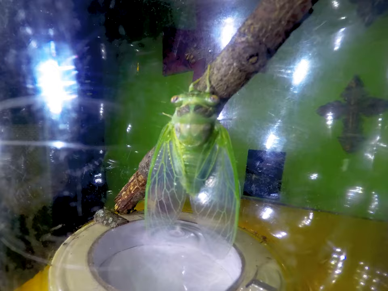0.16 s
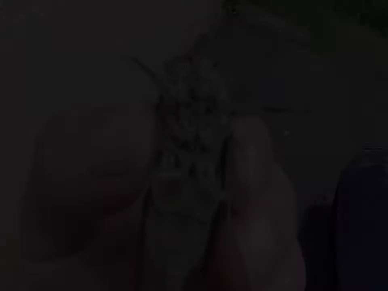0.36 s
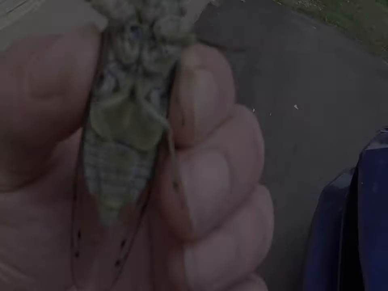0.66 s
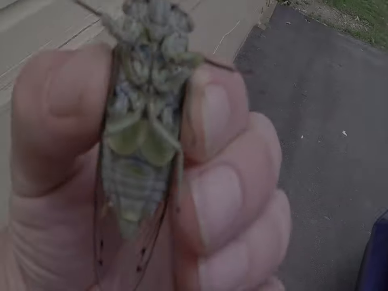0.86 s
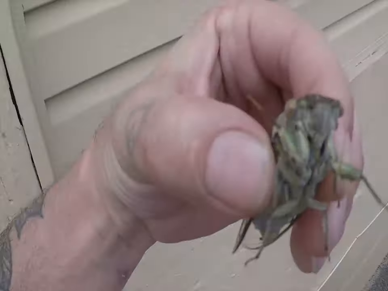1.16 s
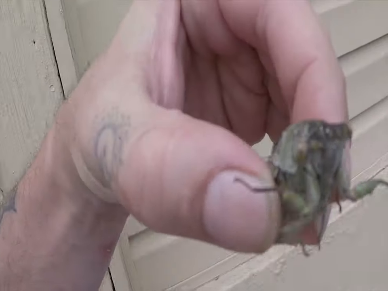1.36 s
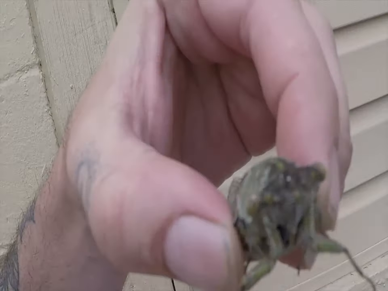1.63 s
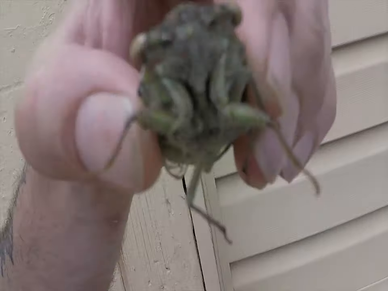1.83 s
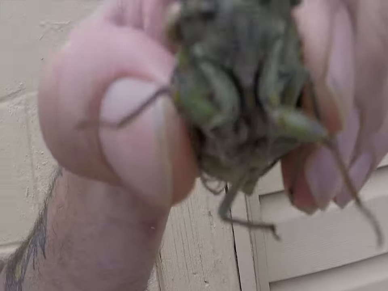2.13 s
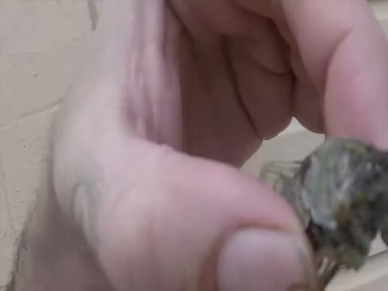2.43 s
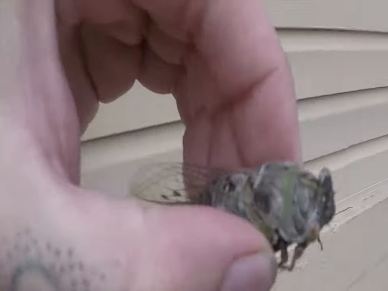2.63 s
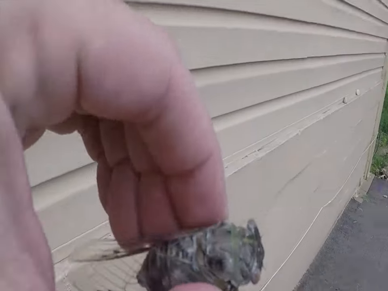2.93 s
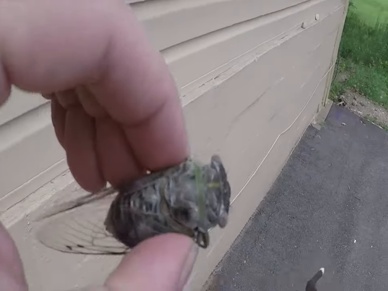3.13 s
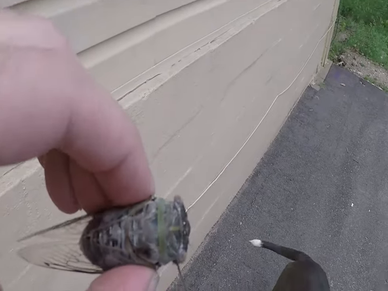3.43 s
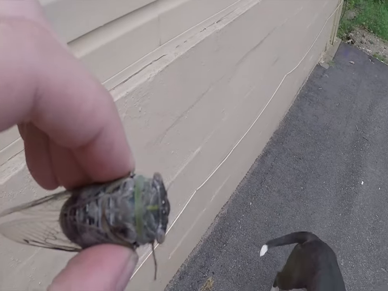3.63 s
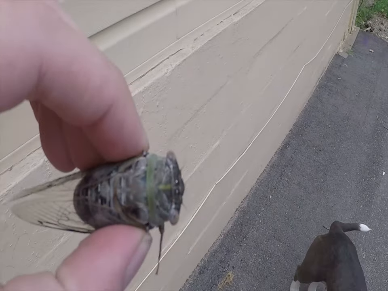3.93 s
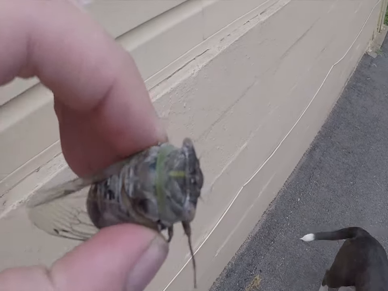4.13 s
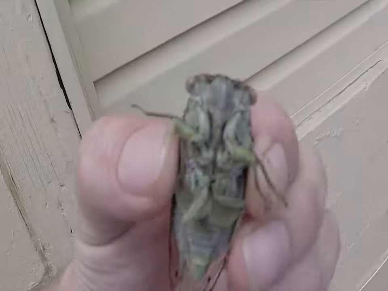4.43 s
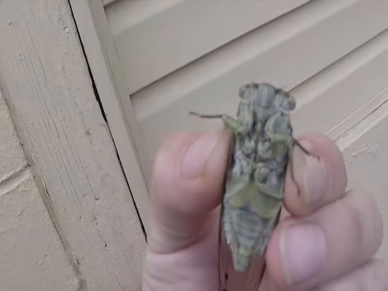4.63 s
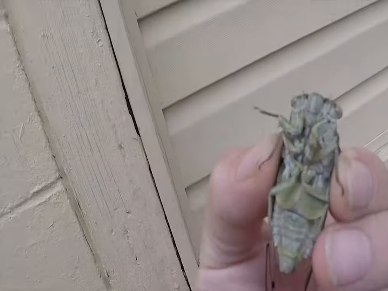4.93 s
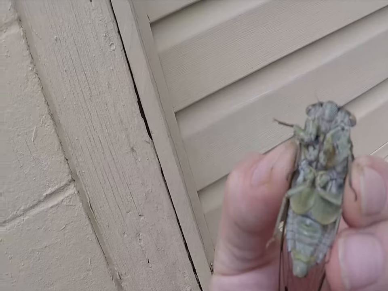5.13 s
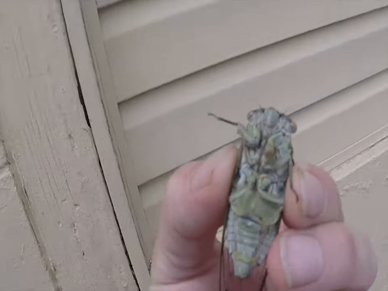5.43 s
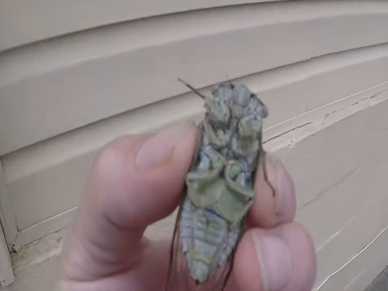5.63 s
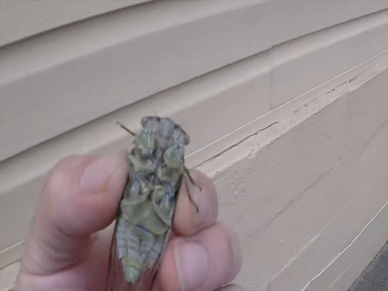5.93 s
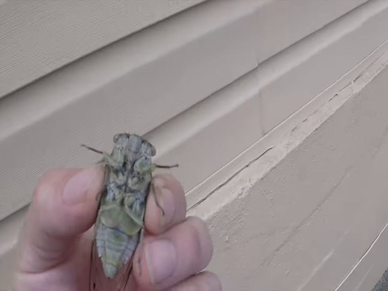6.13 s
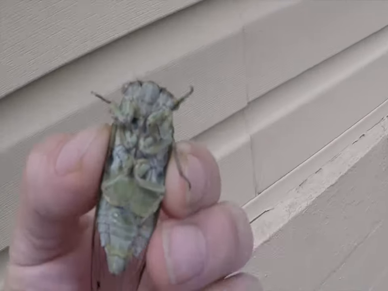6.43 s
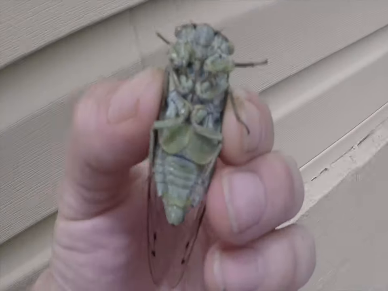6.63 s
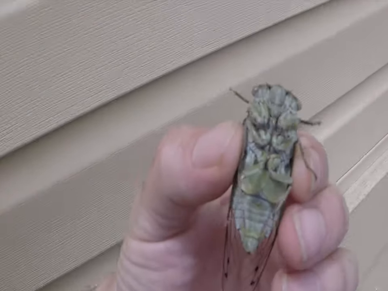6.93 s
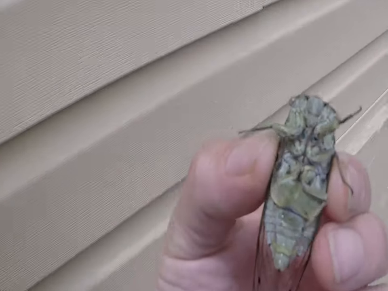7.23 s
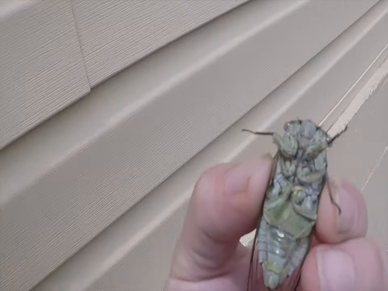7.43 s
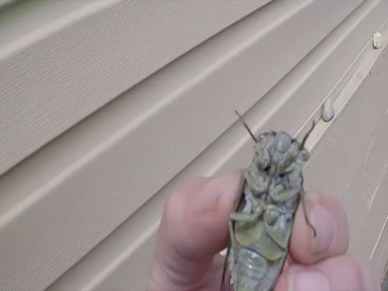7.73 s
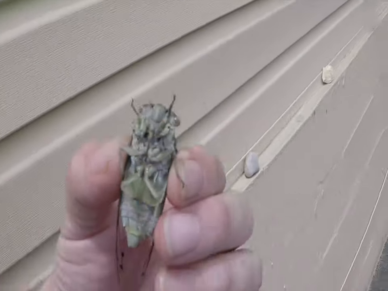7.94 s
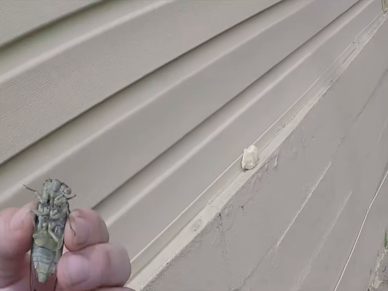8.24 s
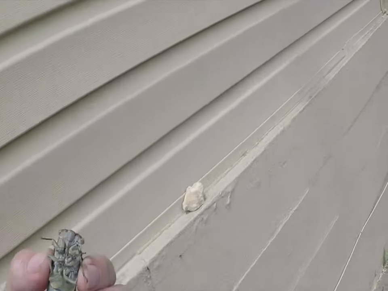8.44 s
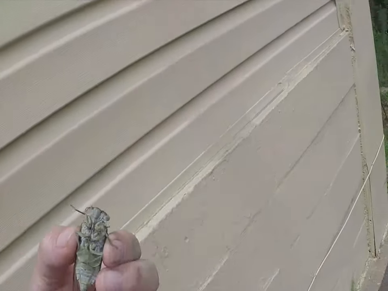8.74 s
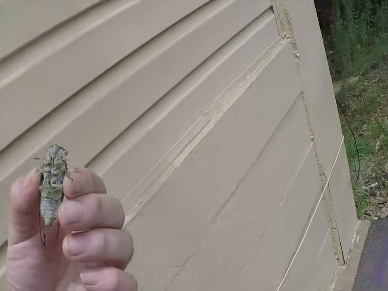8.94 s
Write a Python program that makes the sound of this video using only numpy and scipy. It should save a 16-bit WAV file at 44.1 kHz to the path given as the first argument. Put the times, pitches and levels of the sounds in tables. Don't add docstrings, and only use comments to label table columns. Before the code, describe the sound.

After brief silence, a steady outdoor compressor and fan hum with airy roar cuts in abruptly; light finger taps, wind thumps, and one sharp snap.

```python
import sys
import numpy as np
from scipy import signal
from scipy.fft import rfft, irfft, next_fast_len
from scipy.io import wavfile

SR = 44100
rng = np.random.default_rng(int(sys.argv[2]) if len(sys.argv) > 2 else 0)


def level_to_linear(level):
    exponent = np.asarray(level, float) / 20
    return 10 ** exponent


def persist_wave(psi):
    counts = np.round(np.clip(psi, -1, 1) * 32767).astype(np.int16)
    wavfile.write(sys.argv[1], SR, np.atleast_2d(counts).T)


N = 399987
STEP = 16
CUT_IN_S = .7974


def rms_one(x):
    return x / np.sqrt(np.mean(x ** 2) + 1e-20)


def pan(db):
    return level_to_linear(np.array([[db / 2], [-db / 2]]))


def clock():
    return np.arange(N // STEP + 1) * STEP / SR


def held(control):
    return np.repeat(control, STEP)[:N]


def drift(rate):
    r = np.exp(-2 * np.pi * rate * STEP / SR)
    noise = rng.standard_normal(N // STEP + 5001)
    slow = signal.lfilter([1], [1, -2 * r, r * r], noise)[5000:]
    return rms_one(slow - slow.mean())


def shifted(level_db, shifts):
    t = clock()
    return level_db + sum(db * np.exp(-.5 * ((t - s) / half) ** 2) for s, half, db in shifts)


def swells(rows, rest_db, edge):
    t = clock()
    power = 0
    for s, length, db in rows:
        plateau = (np.tanh((t - s) / edge) - np.tanh((t - s - length) / edge)) / 2
        power = power + level_to_linear(2 * db) * plateau
    return 10 * np.log10(level_to_linear(2 * rest_db) + np.abs(power))


def port_white():
    # f/Hz, likeness (0-1), left leads/rad, left minus right level/dB
    port_table = [(20, .955, 0, -1.3), (60, .95, .05, -1), (150, .982, .13, 0), (450, .99, .25, 1),
                  (700, .72, .5, 2), (1000, .25, 1, 3), (1250, .45, 3, 1), (1500, .2, 1.2, 4),
                  (1750, .72, 2.2, 3), (2050, .62, 3.1, 2), (2400, .7, 4.6, 1), (2700, .25, 5.6, 2),
                  (3000, .58, 6.1, 1.5), (4200, .52, 6.6, 1), (4750, .12, 7.3, 0), (6000, .18, 9.4, 0),
                  (7500, .1, 9, -1), (8500, .08, 10, -3.5), (15000, .08, 14, -3)]
    shared, left, right = rfft(rng.standard_normal((3, next_fast_len(N))))
    hz = np.linspace(.01, SR / 2, len(shared))
    at, alike, lead, tilt_db = np.transpose(port_table)
    alike = np.interp(hz, at, np.clip(alike, 0, 1))
    lead = np.interp(hz, at, lead)
    tilt_db = np.interp(hz, at, tilt_db)
    both = []
    for side, own in ((0.96, left), (-0.99, right)):
        common = np.sqrt(alike) * shared * np.exp(.5j * side * lead)
        both.append(level_to_linear(side * tilt_db / 2) * (common + np.sqrt(1 - alike) * own))
    return hz, np.array(both)


def port_noise(spectrum, hz, white):
    at, level_db = np.transpose(spectrum)
    colour = level_to_linear(np.interp(np.log(hz), np.log(at), level_db, -150, -150))
    out = irfft(colour * white, next_fast_len(N))[:, :N]
    return out / np.sqrt(np.mean(out.mean(axis=0) ** 2))


def wall_echo(x, strength):
    # t/s, extra path/m, echo share (0-1)
    wall_path = [
        (.8, 0.76, 0),
        (5.95, 0.56, 0.11),
        (6.15, 0.57, 0.25),
        (6.9, 0.47, 0),
        (7.1, 0.564, 0.72),
        (7.95, 0.47, 0.2),
        (8.15, 0.61, 0.3),
        (8.5, 0.536, 0.2),
        (8.72, 0.46, 0.3),
        (9.07, 0.52, 0.4),
    ]
    s, path, share = np.transpose(wall_path)
    t = np.arange(N) / SR
    late = t - np.interp(t, s, path) / 343
    echo = [np.interp(late, t, channel) for channel in x]
    return x + strength * np.interp(t, s, np.clip(share, 0, 1)) * echo


def air():
    # f/Hz, level/dB per Hz
    wind_colour = [(6, -2), (14, -1), (24, 0), (34, -4), (45, -9), (60, -33)]
    rumble_colour = [(35, -19), (55, -2), (90, -1), (175, -1.5), (215, -2), (300, -4), (380, -6.5),
                     (430, -8), (500, -8), (570, -49)]
    low_middle_colour = [(470, -32), (530, 2), (630, 0), (750, -2), (860, -3.5), (950, -5), (1050, -35)]
    middle_colour = [(900, -15.5), (1000, 0.5), (1080, 1), (1200, -3.5), (1400, -2.5), (1600, -0.5),
                     (1850, -2), (2000, -4.5), (2200, -9), (2400, -35)]
    hiss_colour = [(2050, -34), (2300, 1), (2600, -3), (3200, -3), (4000, -6), (4800, -7.5), (5500, -5),
                   (6300, -2.5), (7200, -5), (8000, -11), (9500, -13.5), (10500, -20), (11300, -30),
                   (15000, -36)]
    # start t/s, length/s, level/dB
    push_rows = [(.8, .12, -8), (.95, .25, -8), (1.267, 0.038, -4.5), (1.447, 0.044, -6),
                 (1.563, 0.3, -9.5), (2.021, 0.19, -16), (2.239, 0.034, -11), (2.335, 0.072, -9),
                 (2.528, 0.12, -9.5), (2.905, 0.034, -18), (3.065, 0.44, -17.5), (3.606, 0.106, -17),
                 (4.675, 0.12, -10.5), (4.851, 0.76, -14), (5.735, 0.27, -13), (6.234, 0.034, -23),
                 (6.435, 0.032, -12), (6.569, 0.34, -14), (6.94, 0.2, -8), (7.551, 0.059, -7),
                 (7.679, 0.038, -12), (7.82, 0.04, -9), (7.956, 0.055, -8), (8.355, 0.063, -13),
                 (8.479, 0.21, -17), (8.912, 0.046, -9.5)]
    # middle t/s, half length/s, change/dB
    low_lifts = [
        (2.15, 0.062, -3),
        (5.704, .1, -0.5),
        (6.3, 0.22, 2),
        (7.4, 0.24, 3.5),
        (7.75, 0.16, 2),
        (8.3, 0.04, 1.5),
        (8.748, 0.038, -1),
        (8.97, 0.059, -0.5),
        (6.75, .2, 2),
        (8.85, .08, 0),
    ]
    # middle t/s, half length/s, change/dB
    upper_lifts = [
        (6.703, 0.2, 2),
        (7.6, .3, 0),
        (8.8, .2, -0.5),
    ]
    white = port_white()
    upper_db = shifted(-34.5, upper_lifts) + 0.25 * drift(7)
    lower_db = shifted(-32.5, low_lifts) + 0.5 * drift(3.7)
    hiss_db = -38 + 0.39 * drift(7)
    rumble_db = -17.5 + 0.46 * drift(6.6)
    push_db = swells(push_rows, -18.5, 0.063) - 5.5 + 1.0 * drift(3.4)
    upper = held(level_to_linear(upper_db)) * port_noise(middle_colour, *white)
    lower = held(level_to_linear(lower_db)) * port_noise(low_middle_colour, *white)
    out = held(level_to_linear(hiss_db)) * port_noise(hiss_colour, *white)
    out += wall_echo(upper, .35) + wall_echo(lower, 0.82)
    out += held(level_to_linear(rumble_db)) * port_noise(rumble_colour, *white)
    return out + held(level_to_linear(push_db)) * port_noise(wind_colour, *white)


def puffs():
    # t/s, level/dB, length/s
    puff_rows = [(3.17, -37, .012), (3.223, -14, 0.015), (3.38, -32, .05), (3.642, -20.5, 0.15),
                 (6.482, -16, .02), (6.99, -17, 0.021), (7.104, -5, 0.0038), (7.528, -18, 0.018),
                 (7.791, -18, 0.0053), (8.337, -33, .01), (8.386, -34, 0.027)]
    t = np.arange(N) / SR
    shape = sum(level_to_linear(db) * np.exp(-np.abs(t - s) / length) for s, db, length in puff_rows)
    band = signal.butter(2, [25, 400], "band", fs=SR, output="sos")
    low = signal.sosfilt(band, rng.standard_normal(N))
    return shape * rms_one(low) * np.array([[1], [0]])


def ticks():
    # t/s, peak level/dB, ring f/Hz, length/ms, left minus right level/dB
    tick_rows = [
        (2.9364, -15, 2100, .24, -1),
        (7.0966, -18, 3200, .12, -3),
        (8.9768, -13, 780, 1.1, 6),
    ]
    out, t = np.zeros((2, N)), np.arange(-200, 200) / SR
    late = t + np.array([[.00005], [-.00005]])
    for s, peak_db, hz, length_ms, pan_db in tick_rows:
        i = round(s * SR) - 200
        bell = np.exp(-.5 * (late / (length_ms * .001)) ** 2)
        out[:, i:i + len(t)] += level_to_linear(peak_db) * pan(pan_db) * np.cos(2 * np.pi * hz * late) * bell
    return out


def taps():
    # t/s, peak level/dB, pulse width/ms, thump re peak/dB, left minus right level/dB
    tap_rows = [
        (0.8511, -15, 0.41, 1.5, -3),
        (1.0355, -12.5, 0.45, 0, -3.5),
        (1.1336, -15.5, 0.42, -.5, -4),
    ]
    out, t = np.zeros((2, N)), np.arange(-400, 1200) / SR
    push = -np.exp(-.5 * ((t - .002) / 0.00125) ** 2)
    push += 0.34 * np.exp(-.5 * ((t - .006) / 0.0023) ** 2)
    for s, peak_db, width_ms, thump_db, pan_db in tap_rows:
        bump = np.exp(-.5 * (t / (width_ms * 0.00035)) ** 2)
        i = round((s + .002) * SR) - 400
        out[:, i:i + len(t)] += level_to_linear(peak_db + 14.0) * (bump * pan(pan_db) + level_to_linear(thump_db) * push)
    return out


def snaps():
    # t/s, peak level/dB, ring f/Hz, decay/ms
    slip_rows = [
        (6.9786, -5, 5500, .07),
        (6.9864, -7, 7000, .17),
        (6.9962, -15, 6500, .1),
        (7.00093, -7, 2600, .22),
        (7.0962, -12, 2100, .16),
    ]
    # start t/s, stop t/s, level at its end/dB
    scrape_span = (6.977, 7.001, -26)
    out, t = np.zeros((2, N)), np.arange(-100, 100) / SR
    for s, peak_db, hz, decay_ms in slip_rows:
        i = round(s * SR) - 100
        ring = np.cos(2 * np.pi * hz * t) * np.exp(-np.abs(t) / (decay_ms * .001))
        out[1, i:i + len(t)] -= level_to_linear(peak_db) * ring
    out = signal.sosfilt(signal.butter(4, 10000, fs=SR, output="sos"), out + 1e-18)
    dull = level_to_linear(-2) * signal.lfilter([.3], [1, -.7], out[1])
    out[0, 6:] = -dull[:-6]

    start, stop = round(scrape_span[0] * SR), round(scrape_span[1] * SR)
    grit = rng.standard_normal((2, 2000)) * rng.exponential(1, 2000) * pan(-5)
    band = signal.butter(2, [1500, 7500], "band", fs=SR, output="sos")
    rise = np.linspace(.3, 1, stop - start)
    out[:, start:stop] += level_to_linear(scrape_span[2]) * signal.sosfilt(band, grit)[:, :stop - start] * rise

    after = np.arange(6000) / SR
    onset = 1 - np.exp(-(after / 0.036) ** 3)
    jolt = np.sin(2 * np.pi * 21 * after + 1.3) * np.exp(-after / 0.05) * onset
    out[:, start:start + len(after)] += level_to_linear(2.5) * jolt * pan(-1)
    return out


def crack():
    crack_s, crack_db, left_lag = 7.00053, -4.5, 7
    load_s, relax_s = .00008, .0004
    out, t = np.zeros((2, N)), np.arange(-100, 200) / SR
    loading, relaxing = np.exp(-np.abs(t) / load_s), -np.exp(-np.abs(t) / relax_s)
    step = level_to_linear(crack_db) * np.where(t < 0, loading, relaxing)
    spike = level_to_linear(crack_db - 2) * np.exp(-np.abs(t + .00004) / .00004)
    i = round(crack_s * SR) - 100
    out[1, i:i + len(t)] = step + spike
    dull = level_to_linear(-1) * signal.lfilter([.55], [1, -.45], step)
    out[0, i + left_lag:i + left_lag + len(t)] = -dull
    return signal.sosfilt(signal.butter(2, 11000, fs=SR, output="sos"), out + 1e-18)


def families():
    # middle t/s, half length/s, change/dB
    blade_shifts = [
        (3.504, 0.21, 1),
        (5.3, 0.053, -1),
        (6.8, 0.26, -1),
        (7.55, 0.72, -1),
        (8.172, 0.075, 3),
        (8.9, .12, -2),
    ]
    pump_shifts = [
        (1.0, 0.22, 5.5),
        (1.93, 0.13, 1),
        (4.85, 0.22, 1.5),
        (5.19, 0.04, -1.5),
        (6.7, 0.21, 5.5),
        (7.25, 0.12, -1),
        (7.75, 0.14, 3),
        (8.3, 0.3, 3.5),
        (9.07, 0.086, -3.5),
    ]
    gear_shifts = [(1.0, 0.7, -4.5), (1.84, 0.053, 0), (2.46, 0.079, -6), (2.9, .2, -1), (4.8, 0.18, -2.5),
                   (5.8, 0.14, 1.5), (6.3, 0.11, -7), (6.9, .1, 1), (7.3, 0.3, -3.5), (8.0, 0.19, -20),
                   (8.37, 0.11, 5.5), (8.85, 0.25, -13)]
    overtone_shifts = [(1.5, .5, -5), (2.6, .1, 4), (3.1, .2, 5.5), (3.65, .15, -5), (4.25, .1, 1.5),
                       (5.1, .1, 5), (5.5, .15, 11), (5.8, .1, 0), (6.4, 0.22, 5.5), (7.0, 0.16, -10),
                       (7.75, .2, 8), (8.3, .25, -9), (8.8, .12, 8)]
    whine_gaps = [(1.085, .006, -9), (1.108, .004, -7), (7.38, .008, -6), (7.48, .012, -12),
                  (7.575, .01, -8), (7.645, .008, -7), (7.815, .008, -7), (7.99, .008, -8),
                  (8.19, .012, -3), (8.28, .012, -7), (8.765, .01, -9), (8.915, .008, -8),
                  (8.965, .008, -8)]
    # start t/s, length/s, level/dB
    second_swells = [(1.3, 0.056, -12.5), (1.48, 0.41, -14.5), (2.151, 0.37, -22), (2.522, 0.088, -30),
                     (2.678, 0.4, -22.5), (3.253, 0.14, -23), (3.52, 0.67, -18), (4.34, 0.18, -17),
                     (4.595, 0.29, -23.5), (4.937, 0.033, -16), (5.136, 0.13, -22), (5.377, 0.3, -25.5),
                     (5.885, 0.086, -33), (6.037, 0.31, -21), (6.354, 0.072, -22), (6.521, 0.074, -24),
                     (6.679, 0.22, -22), (7.232, 0.16, -18), (7.46, 0.077, -20), (7.689, 0.17, -18.5),
                     (7.946, 0.064, -20), (8.068, 0.038, -34), (8.18, 0.12, -22), (8.387, 0.083, -37),
                     (8.529, 0.052, -41), (8.65, 0.12, -30), (8.9, 0.061, -16)]
    third_swells = [(1.2, 0.28, -22), (1.511, 0.074, -16.5), (2.117, 0.41, -33), (2.506, 0.087, -32),
                    (2.744, 0.31, -28), (3.275, 0.022, -25), (3.476, 0.096, -26), (3.69, 0.25, -24),
                    (4.011, 0.032, -19), (4.173, 0.062, -15.5), (4.38, 0.03, -16.5), (4.538, 0.27, -24.5),
                    (4.839, 0.038, -30), (4.965, 0.14, -19.5), (5.248, 0.15, -23), (5.472, 0.05, -31),
                    (6.002, 0.46, -22.5), (6.515, 0.62, -22), (7.214, 0.062, -14), (7.409, 0.076, -13.5),
                    (7.533, 0.31, -16.5), (7.896, 0.048, -19.5), (7.998, 0.37, -18), (8.443, 0.039, -18),
                    (8.561, 0.071, -21), (8.748, 0.19, -21.5), (8.974, 0.068, -20)]
    whine_swells = [(.8, .07, -40), (.92, .07, -41), (1.0, 0.12, -35), (1.14, .12, -46), (1.27, 0.17, -36),
                    (1.44, .11, -38), (1.57, 0.2, -38.5), (1.81, 0.11, -40), (1.95, 0.16, -44.5),
                    (2.33, 0.68, -37.5), (3.0, 0.37, -41.5), (3.38, 0.25, -40), (3.76, 0.54, -39),
                    (4.3, 0.27, -39.5), (4.58, .2, -39.5), (4.8, 0.23, -41), (5.05, 0.3, -47.5),
                    (5.42, 0.37, -45.5), (5.8, 0.092, -41), (5.9, .06, -39), (5.96, 0.1, -38.5),
                    (6.05, 0.12, -41), (6.2, 0.089, -42), (6.3, .065, -39), (6.4, .06, -42),
                    (6.48, 0.073, -45), (6.6, .04, -46), (6.75, .06, -42), (6.83, 0.087, -45),
                    (7.07, 0.061, -39.5), (7.25, .05, -45), (7.32, .04, -41), (7.41, 0.059, -39),
                    (7.51, 0.056, -37.5), (7.6, 0.056, -38), (7.68, 0.033, -33), (7.72, 0.1, -37.5),
                    (7.85, 0.035, -38), (7.92, .04, -38.5), (8.0, 0.04, -35), (8.07, 0.082, -42),
                    (8.3, .08, -41), (8.39, 0.047, -35.5), (8.52, 0.047, -42), (8.6, 0.036, -45),
                    (8.68, .06, -41), (8.79, .04, -45), (8.845, 0.046, -39), (8.97, .1, -42.5)]
    motor_edge_s, whine_edge_s = 0.015, .021
    whine = shifted(swells(whine_swells, -50, whine_edge_s), whine_gaps)
    whine = whine + .4 * (clock() > 5.0) * drift(26.0)
    return [shifted(-19.5, blade_shifts),
            shifted(-26.5, pump_shifts),
            swells(second_swells, -25, motor_edge_s),
            swells(third_swells, -28.5, motor_edge_s),
            whine,
            shifted(-37.5, gear_shifts) + 0.7 * drift(2.6),
            shifted(-43.5, overtone_shifts)]


def machine_tones():
    # f/Hz, level re family/dB, family (0 blade, 1 pump, 2-3 motor, 4 whine, 5 gear, 6 overtone),
    # own wander/dB, left leads/rad
    tone_rows = [(36.3, -9.5, 3, 3, 0), (72.6, -3, 2, .6, .1), (109, -3, 3, .8, .1),
                 (145.3, -8.5, 3, 3, .13), (205, -12, 0, 3, .16), (259.8, 1.2, 0, .4, .24),
                 (519.6, -23, 0, 3, .3), (779.5, -1, 6, 2, .5), (458.8, 1.5, 1, .4, .28),
                 (943.9, 0, 5, .6, 1.1), (2066, -27.5, 0, 3, 2.3), (2360, 5.2, 4, .3, 4.35),
                 (2407, -13, 4, 2, 5), (2832, -32, 0, 2.5, 5.3), (2983, -41, 0, 3, 6.1),
                 (2296, -14, 4, 3, 4), (2504, -17, 4, 3, 4.6), (2860, -43, 0, 3, 6), (1300, -38, 0, 3, 1),
                 (2394, -17, 4, 3, 4.3)]
    swell, t, starts = families(), clock(), []
    sides = np.array([[.5], [-.5]])
    for hz, level_db, family, wander_db, lead in tone_rows:
        phase = 2 * np.pi * (hz * t + rng.random()) + 0.5 * drift(1.16) + 1e-4 * hz * drift(26)
        turn = lead * (1 + 0.0075 * drift(0.31))
        gain = np.sqrt(2) * level_to_linear(swell[int(round(family))] + level_db + wander_db * drift(1.45))
        starts.append(gain * np.exp(1j * (phase + sides * turn)))
    spin = np.exp(2j * np.pi * np.outer(np.array(tone_rows)[:, 0], np.arange(STEP) / SR))
    return (np.moveaxis(starts, 0, -1) @ spin).imag.reshape(2, -1)[:, :N]


def scene():
    return machine_tones() + air() + taps() + snaps() + crack() + puffs() + ticks()


def gain_control():
    start_down_db, climb_db_per_s = 10, 7
    duck_s, attack_s, duck_db, duck_back_s = 7.0015, .002, 11, .035
    sag_db, sag_hold_s, sag_back_db_per_s = 3, 0.45, 3
    t = np.arange(N) / SR
    after = np.maximum(t - duck_s, 0)
    sag = np.clip(sag_db - sag_back_db_per_s * (after - sag_hold_s), 0, sag_db)
    duck = (1 - np.exp(-after / attack_s)) * (duck_db * np.exp(-after / duck_back_s) + sag)
    climb = np.minimum(climb_db_per_s * (t - CUT_IN_S) - start_down_db, 0)
    return climb - duck


def roll_off(x):
    return signal.sosfilt(signal.butter(12, 14980, fs=SR, output="sos"), x)


def record(dry):
    since = np.arange(N) / SR - CUT_IN_S
    swing = -level_to_linear(-17) * np.exp(-np.abs(since) / .0006)
    rounded = 1.369 * np.tanh((level_to_linear(gain_control()) * dry + swing) / 1.226)
    return roll_off(rounded * (since >= 0))


dry = scene()
out = record(dry)
persist_wave(out)
```